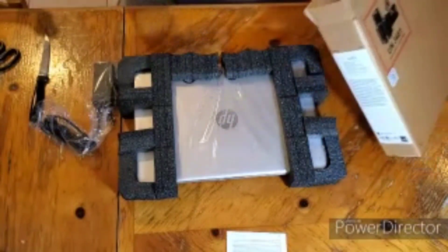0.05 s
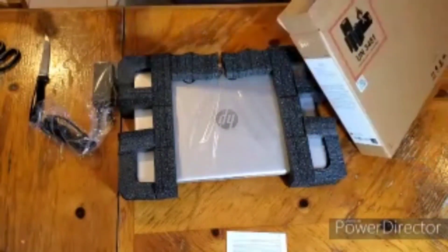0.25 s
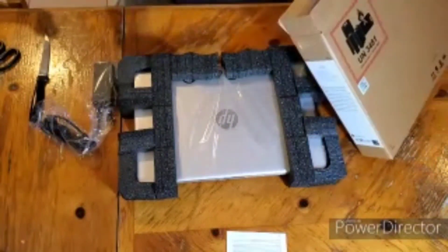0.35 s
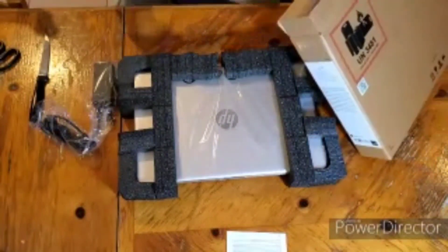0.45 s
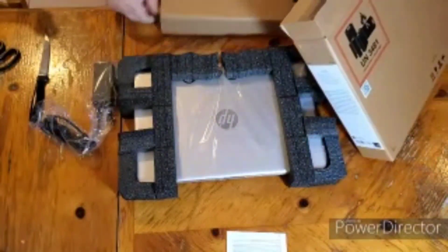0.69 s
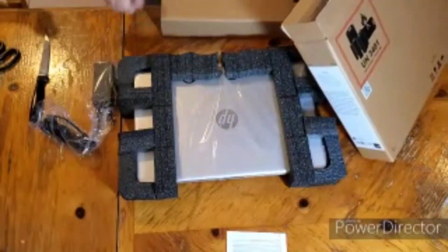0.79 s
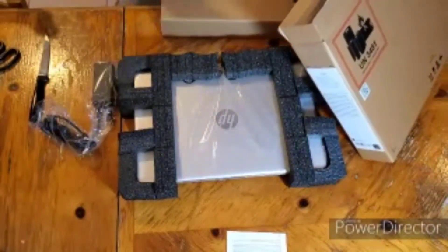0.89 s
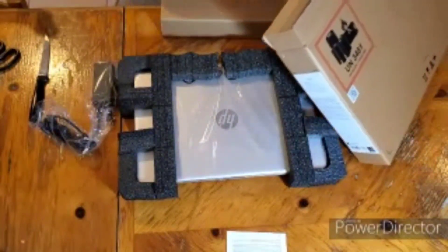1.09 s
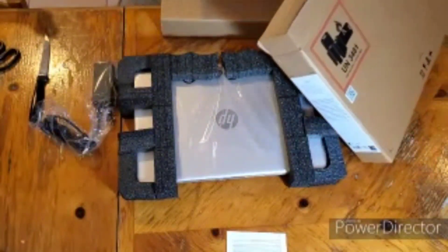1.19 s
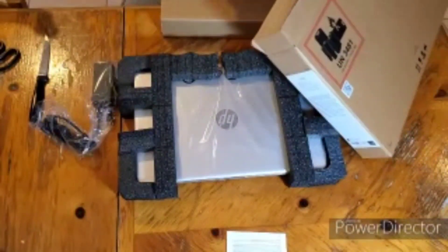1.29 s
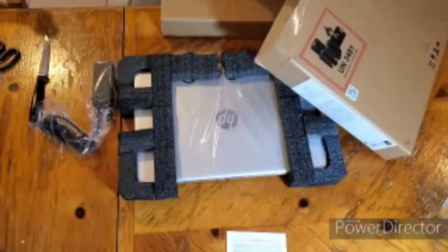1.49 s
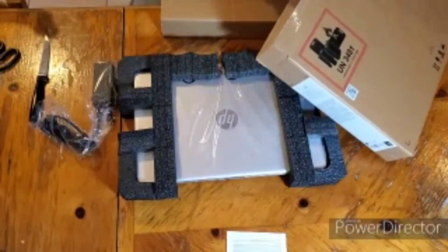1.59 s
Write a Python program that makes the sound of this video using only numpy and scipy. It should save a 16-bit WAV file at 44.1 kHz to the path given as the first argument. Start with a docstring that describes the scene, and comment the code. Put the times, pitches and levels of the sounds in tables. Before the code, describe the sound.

A large empty cardboard box slides briefly on a wooden table and bumps down at about 0.2 seconds. After a few soft pats, a smaller box lands with a hollow double knock at around 0.75 seconds. From 1.3 seconds the large box scrapes grittily over foam packing with a thin squeak, bumping again more softly at 1.5 seconds. The room is small and slightly echoing.

```python
"""A large empty cardboard carton slides and bumps down on a wooden table in a small, live room.
A small box touches the table and lands with a hollow knock. The carton then scrapes and squeals
over foam packing, bumps again and settles. Each knock is a click that rings and rattles the card;
each rub is a dense stream of stick-slip grains. Soft pats, low thumps and room tone sit underneath."""
import sys
import numpy as np
from scipy import signal
from scipy.fft import rfft, irfft
from scipy.io import wavfile
from scipy.ndimage import uniform_filter1d

SR = 44100
rng = np.random.default_rng(int(sys.argv[2]) if len(sys.argv) > 2 else 0)


def dump_mix(stems):
    """Bounce the given channels to the path in sys.argv[1] as a 16-bit WAV at rate SR."""
    frames = np.atleast_2d(stems).T  # one column per channel
    limited = np.clip(frames, -1, 1)  # hard clip at full scale
    pcm = np.round(limited * 32767).astype(np.int16)
    wavfile.write(sys.argv[1], SR, pcm)


N = 72765
T = np.arange(N) / SR
# the carton's panel modes, rung by bumps and rubs alike: pitch_hz, level_db, t60_s
CARTON_MODES = [(159.4, -9, .22), (233.6, 11.5, 0.25), (324, -6.5, 0.19), (458, -2.5, 0.18), (497, 2, 0.29),
                (623, -0.5, 0.29), (835, 7.5, 0.07), (948, -1, 0.14), (1046, -0.5, 0.068), (1494, 0, 0.24),
                (1537, 1, 0.11), (1820, -3, 0.12)]


def undb(db):
    """Decibels to gain."""
    return 10 ** (np.asarray(db) / 20)


def unit(x):
    """Scale a response to unit energy."""
    return x / np.sqrt(np.sum(x ** 2))


def through(x, response):
    """Play a sound through an impulse response."""
    return signal.fftconvolve(x, response)[:N]


def on_log_axis(hz, points):
    """Read (freq_hz, value) points on a log-frequency axis."""
    freq_hz, value = np.array(points, float).T
    return np.interp(np.log(np.maximum(hz, 1)), np.log(freq_hz), value)


def colour(eq):
    """Minimum-phase impulse response of an EQ curve of (freq_hz, level_db) points."""
    size = 4096
    hz = np.arange(size // 2 + 1) * SR / size
    cepstrum = irfft(np.log(undb(on_log_axis(hz, eq))))
    cepstrum[1:size // 2] *= 2
    cepstrum[size // 2 + 1:] = 0
    return irfft(np.exp(rfft(cepstrum)))


def even(x):
    """Flatten the broad colour of a noisy response and keep its fine structure."""
    spectrum = rfft(x)
    broad_power = uniform_filter1d(np.abs(spectrum) ** 2, size=500)
    return unit(irfft(spectrum / np.sqrt(broad_power), N))


def fade(t60_s, start_s=0):
    """Hold until start_s, then fall 60 dB every t60_s."""
    return np.exp(-np.log(1000) * np.maximum(T - start_s, 0) / t60_s)


def ring(modes, rise_s=0.0033):
    """Modes that swell briefly and ring out."""
    attack = 1 - np.exp(-T / rise_s)
    return attack * sum(undb(db) * np.sin(2 * np.pi * hz * T) * fade(t60_s) for hz, db, t60_s in modes)


def impulse(start_s):
    """A single click."""
    return 1. * (np.arange(N) == int(start_s * SR))


def room_tail(predelay_s=0.012, build_s=0.00085):
    """Diffuse reflections that build up quickly and die soonest in the bass and top treble."""
    # room decay by band: centre_hz, t60_s
    decays = [(100, 0.15), (260, 0.34), (700, 0.33), (1800, 0.3), (5000, 0.32), (9000, 0.22), (15000, 0.2)]
    noise = rfft(rng.standard_normal(N))
    hz = np.arange(len(noise)) * SR / N
    tail = 0
    for centre_hz, t60_s in decays:
        band = on_log_axis(hz, [(f, f == centre_hz) for f, _ in decays])
        tail = tail + irfft(noise * band, N) * fade(t60_s)
    onset = 1 - np.exp(-np.maximum(T - predelay_s, 0) / build_s)
    return even(tail * onset)


def in_room(x, room_db, side_db=-44, side_hz=(1500, 5000)):
    """Direct sound plus room, nearly mono, with a very faint stereo spread in the treble."""
    mid = x + undb(room_db) * through(x, room_tail())
    treble = signal.sosfilt(signal.butter(2, side_hz, "band", fs=SR, output="sos"), x)
    side = undb(room_db + side_db) * through(treble, room_tail())
    return np.array([mid + side, mid - side])


def rub(envelope, eq, grains_per_s=9000, spread_db=1.4, judder_hz=73, judder_db=1.83,
        ring_db=1, room_db=-6):
    """Dense stick-slip grains of card fibres, juddering in strength and ringing the carton's panels."""
    slips = (rng.random(N) < grains_per_s / SR) * rng.standard_normal(N)
    slips *= undb(spread_db * np.minimum(rng.exponential(size=N), 4))
    judder = np.interp(T * judder_hz, np.arange(N), rng.standard_normal(N))
    level_db = np.interp(T, *np.array(envelope).T) + judder_db * judder
    force = unit(slips) * np.sqrt(N) * undb(level_db)
    grains = through(force, unit(colour(eq)))
    panels = ring(CARTON_MODES)
    ringing = undb(ring_db) * through(grains, panels / np.abs(rfft(panels)).max())
    return (in_room(grains, room_db) + ringing) / np.hypot(1, undb(room_db))


def bend(x, corner_hz=900):
    """Bending waves carry the treble through the card sooner than the bass."""
    pole = np.exp(-2 * np.pi * corner_hz / SR)
    for _ in range(2):
        x = signal.lfilter([-pole, 1], [1, -pole], x)  # all-pass
    return x


def strike(contact, rattle_db, rattle_t60_s, room_db):
    """A hit with its own room reflections and its own dense, quickly damped shiver of the card."""
    hit = in_room(contact, room_db)
    shiver = even(rng.standard_normal(N) * fade(rattle_t60_s))
    return hit + undb(rattle_db) * through(contact, shiver)


def room_tone(level_db=-71.5):
    """The faint rumble and hiss of the room."""
    # noise-bed colour: freq_hz, level_db
    eq = [(25, -9), (60, 9), (130, 5), (300, -11.5), (900, -22), (2000, -29.5), (5000, -44), (8000, -32),
          (15000, -33.5)]
    return undb(level_db) * through(rng.standard_normal(N), unit(colour(eq)))


def table_slide():
    """The carton slides on the table with a dull rub."""
    # swells of the slide: time_s, level_db
    envelope = [(0, -63.5), (.09, -62), (.125, -53.5), (.155, -51), (.18, -53), (.2, -48), (.225, -84),
                (1.255, -94.5), (1.273, -60.5), (1.345, -47), (1.385, -56.5), (1.445, -75), (1.56, -93),
                (1.65, -52.5)]
    # low-mid colour of card on wood: freq_hz, level_db
    eq = [(40, -19), (200, -10), (420, 3.5), (780, 2), (1200, -14.5), (2000, -24.5), (3500, -28),
          (5500, -28), (8000, -45), (15000, -55)]
    return rub(envelope, eq)


def table_rasp():
    """The card rasps as it gathers speed on the wood."""
    # swells of the rasp: time_s, level_db
    envelope = [(0, -71), (.106, -100), (.116, -68), (.17, -58.5), (.205, -68), (.22, -89), (1.41, -90.5),
                (1.445, -50), (1.49, -48.5), (1.58, -66.5), (1.645, -67.5)]
    # midrange bite: freq_hz, level_db
    eq = [(200, -23), (550, -6.5), (950, 0.5), (1400, 2), (1900, -7.5), (2400, -20.5), (2900, -11),
          (3800, -27), (5500, -15.5), (8000, -39), (15000, -51.5)]
    return rub(envelope, eq)


def panel_flex(gain_db=-43):
    """The big panels flex slowly after a push: low thumps of card and table top."""
    # flexes: start_s, level_db
    flexes = [(0.015, -14.5), (0.076, -22.5), (.222, -21), (0.261, 2.5), (0.767, -6.5), (1.201, -17),
              (1.285, -10.5), (1.494, -3.5), (1.565, -7)]
    # bass modes: pitch_hz, level_db, t60_s
    modes = [(51.4, -8, .2), (72.6, 6.5, 0.13), (113.4, -0.5, 0.42), (150.3, 1.5, 0.24)]
    force = sum(undb(db) * impulse(start_s) for start_s, db in flexes)
    return undb(gain_db) * through(force, ring(modes))


def nudges(gain_db=-10):
    """Hands and packing pat softly against the card."""
    # pats: start_s, level_db
    touches = [(0.025, -8), (0.08, -7.5), (0.467, -4), (0.481, -4), (0.571, 1), (0.585, -4), (1.194, -8.5),
               (1.222, -7.5), (1.273, 2.5), (1.629, 2.5)]
    # muffled colour of a pat: freq_hz, level_db
    eq = [(40, -7.5), (110, -4), (190, 4.5), (330, -1.5), (500, -15.5), (900, -22), (2000, -41.5),
          (8000, -63.5)]
    pat = colour(eq)
    pats = [through(undb(db) * impulse(start_s), pat) for start_s, db in touches]
    return undb(gain_db) * sum(in_room(x, room_db=-0.5) for x in pats)


def carton_bumps(gain_db=12, ring_db=-10):
    """The large carton bumps down and its panels ring; softer contacts sound duller."""
    # hits: start_s, level_db, cutoff_hz, rattle_db
    hits = [(0.211, -17.5, 6360, 9.5), (0.217, 0, 4100, -3), (0.2216, 1.5, 13900, 1.5),
            (0.2478, -11.5, 2500, -26), (0.375, -35.5, 1174, 13), (1.4957, -14.5, 1980, 2),
            (1.505, -19, 1440, 1)]
    # body colour of the carton: freq_hz, level_db
    eq = [(40, -18), (110, -10.5), (190, -8), (235, -1.5), (310, -1.5), (420, 3.5), (600, 1.5), (710, -3.5),
          (860, 2.5), (1250, -5.5), (1600, -3.5), (2000, -4.5), (2600, -14.5), (3400, -11.5), (4500, -15.5),
          (5800, -18), (7500, -34), (10500, -41), (15000, -41)]
    body = bend(colour(eq))
    panel_ring = undb(ring_db) * np.linalg.norm(body) * unit(ring(CARTON_MODES))
    out = 0
    for start_s, db, cutoff_hz, rattle_db in hits:
        softness = signal.butter(3, cutoff_hz, fs=SR, output="sos")
        force = signal.sosfilt(softness, undb(db) * impulse(start_s))
        out = out + strike(through(force, body), rattle_db, rattle_t60_s=0.033, room_db=-0.5)
        out = out + through(force, panel_ring)
    return undb(gain_db) * out


def squeals():
    """Card catches on wood or foam in nearly regular stick-slip: rough, narrow tones swell and fade."""
    # catches: peak_s, length_s, pitch_hz, width_hz, level_db
    catches = [(0.217, 0.033, 1662, 400, -49), (1.305, 0.031, 14200, 450, -62),
               (1.307, 0.048, 5950, 700, -53.5), (1.628, 0.025, 1890, 160, -64.5),
               (1.632, 0.012, 5223, 434, -59)]
    out = 0
    for peak_s, length_s, pitch_hz, width_hz, db in catches:
        noise = rng.standard_normal(N) + 1j * rng.standard_normal(N)
        waver = signal.sosfilt(signal.butter(2, width_hz / 2, fs=SR, output="sos"), noise)
        tone = np.real(waver * np.exp(2j * np.pi * pitch_hz * T))
        swell = np.exp(-2 * ((T - peak_s) / length_s) ** 2)
        out = out + undb(db) * swell * tone / np.std(tone)
    return in_room(out, room_db=-7.5)


def small_box(knock_db=8, body_ring_db=8.5, edge_ring_db=6, tick_trim_db=-25):
    """The small box lands: its edge ticks, its hollow body knocks, the air inside hums till it settles."""
    # hits: start_s, level_db, body_db, tick_db
    hits = [(0.5651, -23.5, -14.5, 10), (0.7438, -1.5, -1.5, 1), (0.7593, -7.5, -3, -2.5)]
    # colour of the hollow knock: freq_hz, level_db
    body_eq = [(60, -43), (230, -24.5), (310, -24.5), (385, 0), (480, -12), (630, 2), (700, -6),
               (790, -9.5), (870, -2), (1100, 1), (1350, -32.5), (1700, -32.5), (3000, -67)]
    # modes of the body: pitch_hz, level_db, t60_s
    body_modes = [(560, 8, 0.1), (586, 0, 0.37), (606.4, 12, 0.11), (665, 6, 0.2), (878, -3.5, 0.18),
                  (950, 2, 0.23), (1010, -6.5, 0.42), (1060, -1.5, 0.38), (1135, -1, 0.31)]
    # colour of the edge tick: freq_hz, level_db
    edge_eq = [(100, -13), (220, 5), (320, 9.5), (450, 0), (650, -17.5), (1200, 13.5), (1750, -8.5),
               (2300, -7), (4400, -17.5), (5200, -6), (6300, -15.5), (7500, -25.5), (14000, -46.5)]
    # modes of the stiff edge: pitch_hz, level_db, t60_s
    edge_modes = [(167.2, 1, 0.28), (204, -4, 0.13), (300, 0, 0.12), (457, 7.5, 0.12), (860, 12, 0.26),
                  (1157, 3, 0.26), (1250, -2.5, 0.2), (5040, -7, 0.23)]
    body, edge = bend(colour(body_eq)), colour(edge_eq)
    body_ring = undb(body_ring_db) * np.linalg.norm(body) * unit(ring(body_modes))
    edge_ring = undb(edge_ring_db) * np.linalg.norm(edge) * unit(ring(edge_modes))
    air_note = ring([(380.6, -33, 0.39)])  # pitch_hz, level_db, t60_s
    knocks, air = 0, 0
    for start_s, db, body_db, tick_db in hits:
        force = undb(db) * impulse(start_s)
        body_gain, tick_gain = undb(body_db), undb(tick_trim_db + tick_db)
        contact = through(force, body_gain * body + tick_gain * edge)
        knocks = knocks + strike(contact, rattle_db=4, rattle_t60_s=0.076, room_db=8.5)
        knocks = knocks + through(force, body_gain * body_ring + tick_gain * edge_ring)
        air = air + through(force, body_gain * air_note)
    choke = fade(t60_s=0.045, start_s=0.901)  # the box settles flat
    return undb(knock_db) * knocks + choke * air


def foam_whisper():
    """The rubbed foam gives a thin, squeaky whisper."""
    # swells of the whisper: time_s, level_db
    envelope = [(1.15, -101), (1.225, -67.5), (1.26, -61), (1.3, -49.5), (1.37, -59), (1.52, -61),
                (1.59, -94), (1.65, -67)]
    # airy colour of the foam: freq_hz, level_db
    eq = [(300, -30), (2500, -14.5), (4200, -6.5), (5300, -4.5), (6300, -8), (7600, -20.5), (11000, -28.5),
          (14000, -19)]
    return rub(envelope, eq)


def foam_scrape():
    """The carton drags over the foam packing with a gritty scrape."""
    # surges of the scrape: time_s, level_db
    envelope = [(1.17, -86.5), (1.225, -72), (1.266, -83), (1.275, -57), (1.335, -44), (1.375, -52.5),
                (1.418, -52), (1.443, -41.5), (1.478, -50), (1.53, -51), (1.56, -85)]
    # broadband colour of card on foam: freq_hz, level_db
    eq = [(60, -4.5), (200, -8.5), (370, -1.5), (500, -8), (650, -3.5), (950, 1), (1800, -7.5),
          (2400, -3.5), (3400, -4.5), (4300, -3.5), (5700, -4.5), (7700, -17), (10800, -25), (14000, -20.5),
          (15500, -26.5)]
    return rub(envelope, eq)


def scene():
    """Friction on wood and foam, mixed with bumps, knocks and squeals over the room tone."""
    friction = table_slide() + table_rasp() + foam_scrape() + foam_whisper()
    return friction + carton_bumps() + small_box() + nudges() + panel_flex() + squeals() + room_tone()


def record(dry):
    """A steep low-pass cuts the top above 15.5 kHz."""
    return signal.sosfilt(signal.ellip(10, .2, 70, 15500, fs=SR, output="sos"), dry)


dry = scene()
out = record(dry)
dump_mix(out)
```